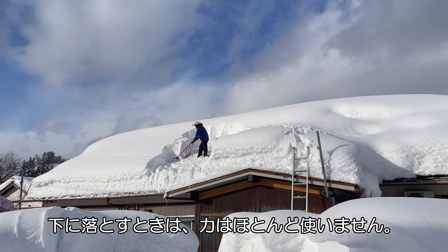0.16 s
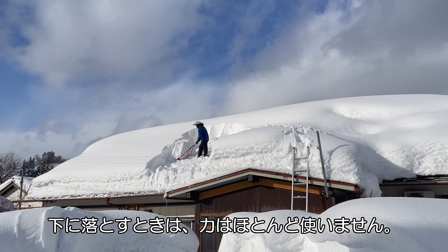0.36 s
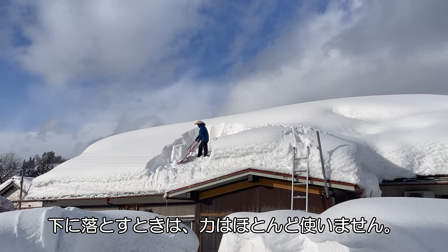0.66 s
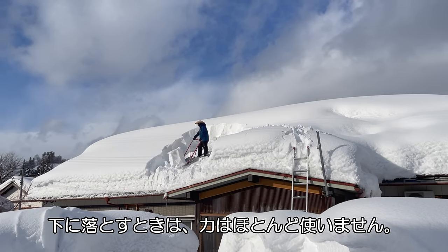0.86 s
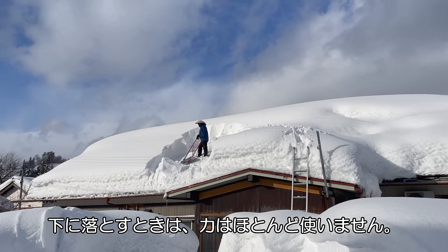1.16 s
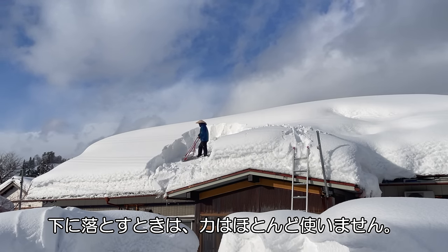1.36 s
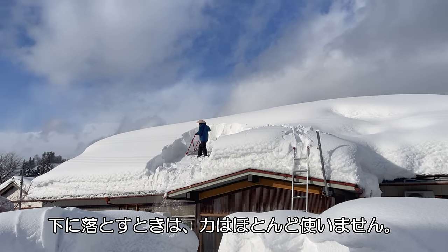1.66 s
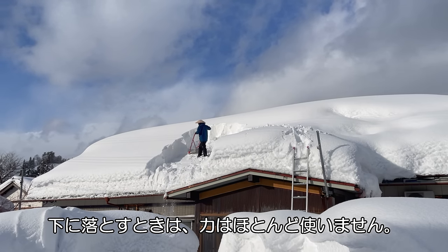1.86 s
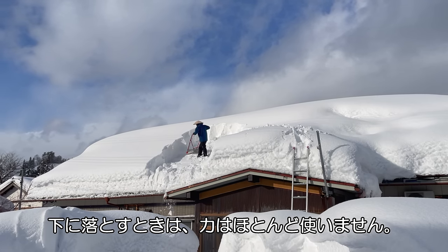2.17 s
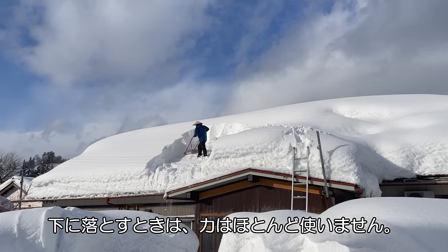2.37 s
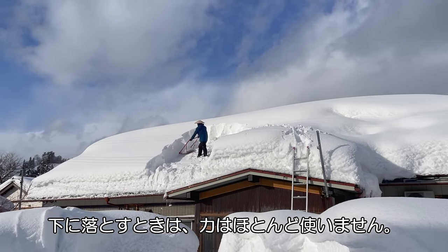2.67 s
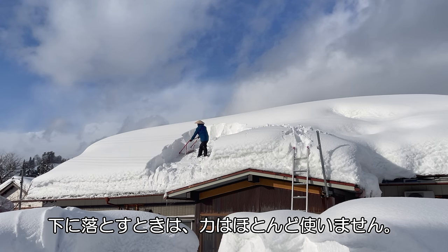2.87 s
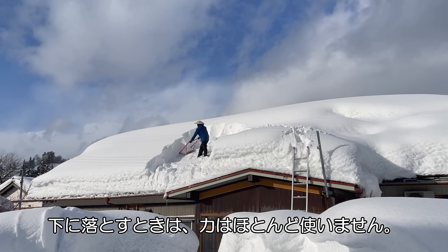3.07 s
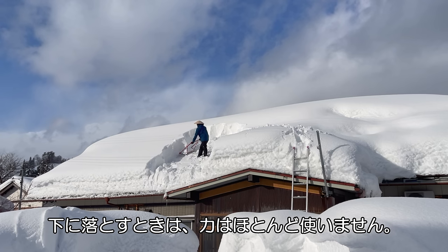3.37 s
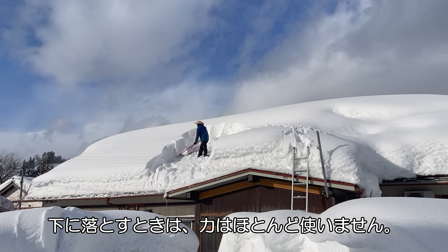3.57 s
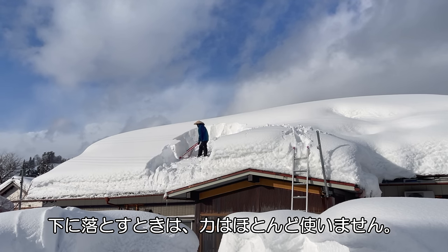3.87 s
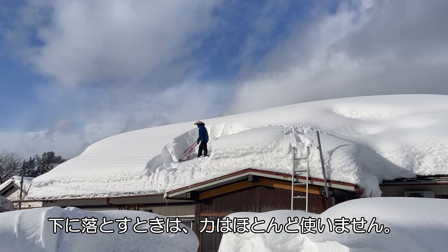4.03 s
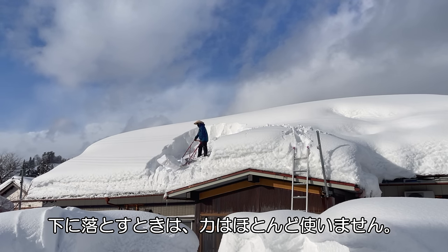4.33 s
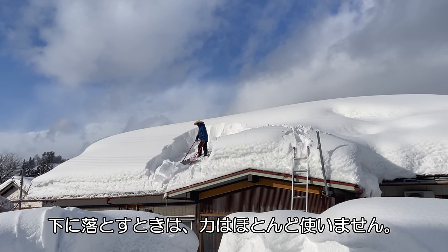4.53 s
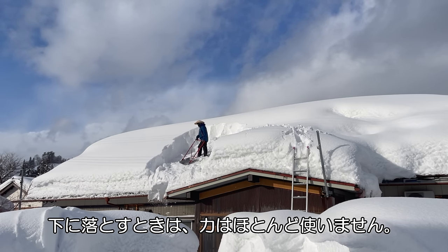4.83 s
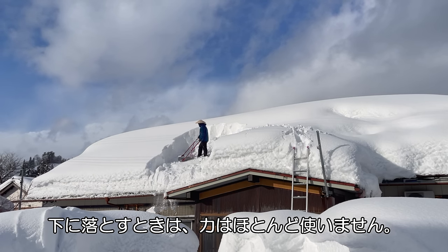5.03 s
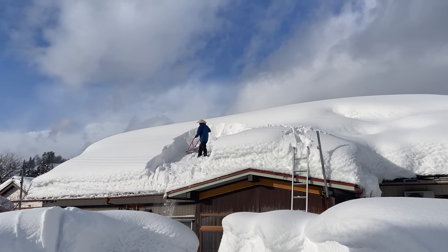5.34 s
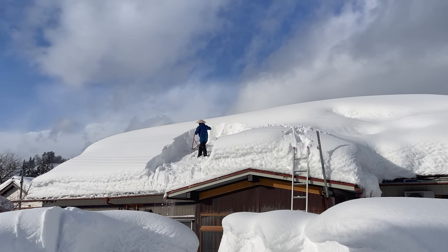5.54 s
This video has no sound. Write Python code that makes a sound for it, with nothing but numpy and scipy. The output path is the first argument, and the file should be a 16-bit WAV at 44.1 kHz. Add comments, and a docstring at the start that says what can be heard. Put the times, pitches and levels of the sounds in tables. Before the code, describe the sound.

Close-sounding dry swishes, gritty and cloth-like with bright fizz and low crunch, start and stop unevenly as snow is cut and slid off a roof. One builds to a loud scuff midway; later ones quicken into short jabs with clicks. Low wind rumble and rounded thumps press on an outdoor stereo microphone, heavily around two seconds and again after three, over a steady faint distant hiss.

```python
"""Dry swishing rub close by in gusty wind

Dry swishes come and go in strokes: shaped noise in three layers, scrape, fizz and crunch.
Ticks are short decaying tones, scuffs are resonant noise bursts, dull knocks are brief low swings.
Wind buffets the microphone in soft low thumps over noise for rumble and drone; a faint far hiss stays behind.
The two microphone ports colour the treble and shift it against each other."""
import sys
import numpy as np
from scipy import signal
from scipy.fft import rfft, irfft, next_fast_len
from scipy.io import wavfile
from scipy.ndimage import uniform_filter1d, map_coordinates

SR = 44100
rng = np.random.default_rng(int(sys.argv[2]) if len(sys.argv) > 2 else 0)


def to_wav(sig):
    """Store sig (one row per channel, or 1-D mono) as 16-bit WAV at the path in sys.argv[1].

    Samples outside -1..1 are clipped; the rate is SR.
    """
    pcm = np.clip(np.atleast_2d(sig), -1, 1) * 32767
    pcm = np.round(pcm).astype(np.int16)
    wavfile.write(sys.argv[1], SR, pcm.T)  # frames by channels


N = 251370  # length in samples, 5.7 s


def amp(db):
    """Gain of a level in dB."""
    return 10 ** (np.asarray(db) / 20)


def unit(x):
    """x at rms 1."""
    return x / np.sqrt(np.mean(x ** 2) + 1e-20)


def along(points, hz):
    """Values of (Hz, value) points read on a log frequency axis."""
    f, v = np.transpose(points)
    return np.interp(np.log(hz + 1), np.log(f + 1), v)


def curve(points):
    """One value per sample from (s, value) points."""
    s, v = np.transpose(points)
    return np.interp(np.arange(N) / SR, s, v)


def wobble(rate):
    """A smooth random curve, rate knots a second."""
    knots = rng.standard_normal(int(N * rate / SR) + 4)
    return map_coordinates(knots, [np.arange(N) * rate / SR])


def filtered(x, response):
    """x times a complex response of frequency."""
    m = next_fast_len(N + SR // 2)
    return irfft(rfft(x, m) * response(np.fft.rfftfreq(m, 1 / SR)), m)[..., :N]


def rush(spectrum, alike, patchy_db, grain_db=0, grains_hz=400):
    """Stereo noise of rms 1 with patches of random gain; grain_db makes it gritty."""
    cells = signal.stft(rng.standard_normal((2, N + 512)), nperseg=512)[2]
    patches = uniform_filter1d(rng.standard_normal(cells.shape[1:]), size=6, axis=0)
    patches = unit(uniform_filter1d(patches, size=8, axis=1))
    pair = signal.istft(cells * amp(patchy_db * patches), nperseg=512)[1][:, :N]
    pair = pair * amp(grain_db * wobble(grains_hz))

    def mid_side(hz):
        # the mid-side balance sets how alike left and right are at each frequency
        turn = np.arccos(np.clip(along(alike, hz), -1, 1)) / 2
        return amp(along(spectrum, hz)) * [np.cos(turn), np.sin(turn)]

    mid, side = filtered(pair, mid_side)
    return unit(np.array([mid + side, mid - side]))


def add(track, s, sound):
    """Lays sound into track, centred on s."""
    start = round(s * SR) - len(sound) // 2
    track[start:start + len(sound)] += sound[:len(track) - start]


CRUNCH_GROWS_DB = 4.5  # the crunch grows over a stroke's hold
# strokes of a dry swishing rub: (start [s], hold [s], rise [ms per 20 dB], fall [ms per 20 dB],
# scrape at start [dB], scrape at end [dB], fizz over scrape at start [dB], fizz over scrape at end [dB],
# crunch over scrape at mid-hold [dB]); swish() lifts the fizz further and makes all three uneven
SWISH_STROKES = [(0.0, 0.23, 10, 200, -64, -72, -7.5, -5, 1),
                 (0.305, 0.034, 198, 172, -59, -56.5, 0.5, 1.5, -7.5),
                 (0.503, 0.23, 152, 200, -59, -62, 5.5, 12, -5),
                 (0.862, 0.086, 250, 100, -58.5, -60.5, 4, 4.5, 4.5),
                 (1.002, 0.069, 80, 80, -66.5, -68, 1, 3, 2.5),
                 (1.131, 0.056, 60, 50, -68.5, -69.5, 9.5, 10.5, 0),
                 (1.218, 0.011, 28, 40, -57.5, -59, 5.5, 6, -5.5),
                 (1.27, 0.063, 34, 105, -67.5, -56, 12, 7.5, -2.5),
                 (1.41, 0.099, 77, 27, -63, -63.5, 9, 4.5, -2.5),
                 (1.619, .26, 5, 90, -61.5, -61.5, 3, -1.5, -6.5),
                 (1.924, 0.14, 60, 60, -65, -72, -12, -13, -3),
                 (2.091, 0.41, 90, 60, -57, -49, -1, 5.5, -4), (2.526, 0.01, 35, 49, -49, -44, 6, 2.5, 0),
                 (2.603, 0.21, 50, 150, -69.5, -81.5, -15, -12, 6.5),
                 (2.893, 0.1, 198, 152, -68.5, -72, -5, -4, 2),
                 (3.161, 0.15, 132, 256, -59, -61, -0.5, -9, -5.5),
                 (3.554, 0.36, 200, 102, -69.5, -60, -4.5, 2, -8.5),
                 (3.97, 0.3, 85, 90, -61, -56, 9.5, 3.5, -3.5),
                 (4.346, 0.032, 88, 70, -56.5, -58, 7, 3, -0.5),
                 (4.435, .075, 70, 107, -60, -66.5, 4.5, 9.5, 3),
                 (4.67, 0.13, 82, 60, -71.5, -70, 0, 15, 8), (4.819, 0.024, 60, 128, -56.5, -59, 12, 7, 1),
                 (4.908, 0.022, 60, 50, -69, -60.5, 4, 4, -9), (5.003, 0.025, 60, 46, -59, -52.5, 2, 6, -6),
                 (5.081, 0.15, 40, 92, -61, -64.5, 9.5, -7, 1.5),
                 (5.402, 0.036, 16, 97, -50.5, -48.5, 0.5, 2.5, -8),
                 (5.525, 0.085, 58, 127, -56.5, -61.5, 2, -5, -5.5)]


def strokes():
    """Levels of scrape, fizz and crunch: each stroke rises, leans from its start to its end level and falls."""
    t, power = np.arange(N) / SR, np.zeros((3, N))
    for s, hold, rise_ms, fall_ms, start_db, end_db, fizz_db, fizz_end_db, crunch_db in SWISH_STROKES:
        u = np.clip((t - s) / hold, 0, 1)
        rising_db = 20 * np.maximum(s - t, 0) / (rise_ms / 1000)
        falling_db = 20 * np.maximum(t - s - hold, 0) / (fall_ms / 1000)
        scrape_db = start_db + (end_db - start_db) * u - rising_db - falling_db
        fizz_over_db = fizz_db + (fizz_end_db - fizz_db) * u
        crunch_over_db = crunch_db + CRUNCH_GROWS_DB * (u - .5)
        power = power + amp(scrape_db + np.array([0 * u, fizz_over_db, crunch_over_db])) ** 2
    return np.sqrt(power)


PATCHY_DB = 1.0  # how much a stroke's colour is mottled
# colour of the scrape: (frequency [Hz], relative density [dB per Hz])
SCRAPE_COLOUR = [(900, -11.5), (1400, 1), (2000, 0), (2700, 0), (3500, 3), (5000, -0.5), (7000, -2),
                 (10000, -60), (16000, -46)]
# colour of the fine bright fizz: (frequency [Hz], relative density [dB per Hz])
FIZZ_COLOUR = [(3000, -50), (5000, -8.5), (6500, -3.5), (8000, 1.5), (12000, -4.5), (16000, 0.5)]
# colour of the low crunch: (frequency [Hz], relative density [dB per Hz])
CRUNCH_COLOUR = [(300, -34), (480, -0.5), (600, -0.5), (850, -4.5), (1350, -8.5), (1900, -10.5),
                 (3000, -20.5)]
# stereo width of the crunch: (frequency [Hz], left-right likeness [0 to 1])
CRUNCH_LIKENESS = [(500, 0.2), (900, 0.077), (1400, 1)]


def swish():
    """Dry swishing rub, like cloth: scrape, fine fizz and low crunch share the stroke's unevenness."""
    scrape, fizz, crunch = strokes() * amp(0.94 * wobble(30))
    scrape = scrape * rush(SCRAPE_COLOUR, [(1000, 0.97)], PATCHY_DB, grain_db=1.0)
    fizz = fizz * amp(1.0) * rush(FIZZ_COLOUR, [(1000, 0.95)], PATCHY_DB, grain_db=1.5)
    crunch = crunch * amp(1.1 * wobble(20))  # the crunch is more uneven still
    crunch = crunch * rush(CRUNCH_COLOUR, CRUNCH_LIKENESS, PATCHY_DB, grain_db=2.0, grains_hz=120.1)
    return scrape + fizz + crunch


EDGE_FROM_DB, EDGE_GROWS = -29.5, 1.46  # swings above this level get a sharper edge, dB per dB


def swings(table, rise, linger, rough, sag, soft_db):
    """Short low swings: a dip of pressure rises fast, lingers and sags in pitch; hard ones have a sharp edge."""
    out, t = np.zeros(N), np.arange(-SR // 12, SR // 12) / SR
    for s, db, hz, ms in table:
        u = t / (ms / 1000)
        shape = np.exp(-np.where(u < 0, rise * u ** 4, linger * u ** 2))
        waver = rough * np.cumsum(rng.standard_normal(len(t))) / np.sqrt(len(t))
        phase = 2 * np.pi * hz * t * (1 - sag * np.tanh(u * 1.57)) + waver
        edge_db = soft_db + EDGE_GROWS * max(db - EDGE_FROM_DB, 0)
        edge = amp(edge_db) * np.exp(-(4 * hz * t) ** 2) * np.cos(1.7 * phase)
        add(out, s, -amp(db) * (shape * np.cos(phase) + edge))
    return out


# gusts swelling the rumble, before its random wobble: (time [s], level [dB])
RUMBLE_GUSTS = [(0.0, -55), (0.36, -53), (0.67, -50.5), (1.33, -62), (1.62, -57), (2.0, -38), (2.2, -51.5),
                (2.48, -48), (2.87, -45.5), (3.09, -46), (3.19, -50), (3.63, -56.5), (3.97, -49),
                (4.14, -53.5), (4.75, -54), (5.03, -50), (5.21, -53.5), (5.7, -61)]
# low drone of the wind, before its random wobble: (time [s], level [dB])
DRONE_LEVEL = [(0.0, -59), (0.75, -53.5), (1.11, -60.5), (1.35, -60.5), (1.55, -60), (1.86, -57),
               (2.24, -59.5), (2.43, -51), (2.73, -63), (2.94, -60), (3.76, -61.5), (3.94, -59.5),
               (4.16, -55), (4.37, -54.5), (4.52, -59), (4.73, -59), (5.06, -57), (5.7, -58)]
# puffs of wind on the ports: (time [s], level before the sharp edge [dB], pitch at centre [Hz], time scale [ms])
WIND_THUMPS = [(0.107, -37.5, 60.4, 30), (0.16, -37, 60, 22), (0.22, -38, 59.4, 13), (0.291, -38, 61, 41),
               (0.372, -46, 70, 23), (0.5, -41, 57.6, 24), (0.715, -42, 57, 22), (1.39, -45, 67, 19),
               (1.585, -40.5, 71, 21), (1.61, -41, 59, 20), (1.75, -46, 72, 22), (1.798, -37, 64, 11),
               (1.832, -36, 85, 27), (1.867, -25.5, 72.5, 17), (1.883, -30, 85, 7), (1.897, -29.5, 80, 18),
               (1.928, -20, 78, 15.6), (1.962, -29, 65.4, 11), (2.0, -34, 59, 6.8), (2.026, -23.5, 63, 23),
               (2.072, -36, 57, 19), (2.139, -38.5, 67.5, 14), (2.182, -29, 61.5, 18),
               (2.651, -36.5, 62, 27), (2.712, -34.5, 57.6, 13.8), (2.854, -39, 62.6, 40),
               (2.93, -38, 65, 16), (2.979, -32.5, 68.4, 32), (3.045, -41, 55, 24), (3.13, -24.5, 69, 14.7),
               (3.151, -30, 66.4, 21), (3.195, -32, 54.3, 15), (3.258, -34.5, 78, 20),
               (3.416, -24.5, 78, 21), (3.515, -44, 59, 21), (3.632, -44.5, 56.7, 33), (3.765, -45, 50, 24),
               (3.877, -34, 54.4, 29), (3.985, -44.5, 60.3, 36), (4.06, -41, 64, 42),
               (4.352, -30.5, 66.6, 27), (4.419, -34.5, 66.6, 19), (4.819, -39.5, 56, 32),
               (4.959, -31, 59, 19), (5.012, -34, 65, 20), (5.033, -28, 77, 15), (5.078, -31.5, 60, 25),
               (5.213, -38, 83, 19), (5.4, -41, 54.6, 24), (5.506, -37, 61.5, 26), (5.605, -42, 58, 14),
               (5.653, -37.5, 52.7, 26)]
# colour of the rumble: (frequency [Hz], relative density [dB per Hz])
RUMBLE_COLOUR = [(12, -27), (20, -13), (38, 3), (59, 3.5), (97, -4), (140, -17), (250, -26), (320, -28),
                 (550, -120)]
# colour of the drone: (frequency [Hz], relative density [dB per Hz])
DRONE_COLOUR = [(90, -18), (140, 0.5), (230, -1), (330, -4), (450, -7.5), (650, -23), (1200, -52)]
# stereo width of the drone: (frequency [Hz], left-right likeness [0 to 1])
DRONE_LIKENESS = [(130, 0.89), (260, 0.83), (500, 0.3)]


def wind():
    """Rumble and thumps press both ports almost alike; the drone above differs between them."""
    rumble = amp(curve(RUMBLE_GUSTS) + 1.5 * wobble(14))
    rumble = rumble * rush(RUMBLE_COLOUR, [(60, 0.91)], patchy_db=0.55)
    drone = amp(curve(DRONE_LEVEL) + 2.2 * wobble(14))
    drone = drone * rush(DRONE_COLOUR, DRONE_LIKENESS, patchy_db=1.0)
    thumps = swings(WIND_THUMPS, rise=18.0, linger=0.66, rough=0, sag=0.17, soft_db=-16.5)
    return (rumble + thumps) * amp([[-.6], [.6]]) + drone  # a little louder on the right


# colour of the far hiss: (frequency [Hz], relative density [dB per Hz])
HISS_COLOUR = [(500, 0.5), (900, -4.5), (1500, -8.5), (3000, -16), (5000, -19.5), (7500, -24),
               (9000, -23.5), (11000, -28.5), (16000, -19)]


def far_hiss():
    """Far hiss: wide, mottled noise at a steady faint level."""
    return amp(-64) * rush(HISS_COLOUR, [(1000, 0.27)], patchy_db=3.0)


# short dry ticks: (time [s], peak level [dB], pitch [Hz])
SHORT_TICKS = [(1.068, -36.5, 9550), (1.2755, -43, 3700), (1.327, -51, 1980), (2.5323, -35, 3200),
               (2.7645, -52, 1500), (3.514, -43, 3610), (4.3552, -28, 3500), (4.4362, -42, 2260),
               (4.4704, -32, 6000), (4.649, -53, 1540), (4.817, -27, 8150), (5.3034, -49, 2700)]


def ticks(turns):
    """Short dry ticks: each a click of about one cycle."""
    out, t = np.zeros(N), np.arange(-SR // 100, SR // 100) / SR
    for s, db, hz in SHORT_TICKS:
        slope_db = np.where(t < 0, 30, 12 / turns)  # dB per cycle, steep before the peak, gentler after
        add(out, s, amp(db - hz * np.abs(t) * slope_db) * np.cos(2 * np.pi * hz * t))
    return out


# short scuffs: (time [s], peak level before scene() lowers it [dB], pitch [Hz], burst's 60 dB decay [ms])
RUB_SCUFFS = [(1.274, -40.5, 3760, 34), (1.3073, -37, 8960, 37), (1.3245, -38.5, 1730, 28),
              (2.53, -29, 3220, 49), (3.9658, -39, 1630, 78), (4.818, -48, 8200, 18),
              (4.986, -46, 3580, 40), (5.012, -42, 2790, 52), (5.0523, -31, 9400, 44),
              (5.0765, -37.5, 2690, 110), (5.396, -52, 1750, 54), (5.426, -29, 7100, 33),
              (5.502, -45, 6750, 43)]


def scuffs(sharpness, rise_ms):
    """Short scuffs: bursts of noise that start at once, each loudest around its own pitch."""
    out, t = np.zeros(N), np.arange(-SR // 10, SR // 10) / SR
    after = np.maximum(t, 0)
    rise = 1 - np.exp(-after / (rise_ms / 1000))
    for s, db, hz, ms in RUB_SCUFFS:
        burst = amp(-60 * after / (ms / 1000)) * rise * rng.standard_normal(len(t))
        ring = signal.lfilter(*signal.iirpeak(hz, sharpness, SR), burst)
        add(out, s, amp(db) * ring / np.abs(ring).max())
    return out


# dull hollow knocks: (time [s], level before the edge [dB], pitch at centre before waver [Hz], time scale [ms])
HOLLOW_KNOCKS = [(1.335, -48, 320, 14), (4.238, -52, 555, 16), (4.266, -46, 575, 15.5),
                 (4.398, -48, 597, 21), (5.213, -46, 290, 33), (5.374, -42, 268, 10),
                 (5.388, -39.5, 279, 10)]


def knocks():
    """Dull hollow knocks: short swings whose phase wavers at random, with hardly any edge."""
    return swings(HOLLOW_KNOCKS, rise=18.0, linger=1.8, rough=5.2, sag=0.036, soft_db=-40)


def scene():
    """Swishes, ticks, scuffs and knocks in front, wind at the ports, far hiss behind."""
    front = swish() + ticks(turns=0.81) + amp(-6.0) * scuffs(sharpness=1.0, rise_ms=1.9) + knocks()
    return front * amp([[-.4], [.4]]) + wind() + far_hiss()  # front leans slightly right


TOP_HZ = 15760  # band limit
# treble colour of both ports: (frequency [Hz], gain [dB])
PORT_GAIN = [(7800, 0.5), (8800, -5), (9500, 2.5), (10700, 9), (11500, 5), (12200, -6), (12600, -34),
             (13600, -46), (14100, -8), (14800, -13), (15500, -21)]
# phase of right against left: (frequency [Hz], shift [radians])
PORT_SHIFT = [(60, .3), (700, .5), (1150, -.1), (2400, .05), (3200, .6), (4200, .1), (5300, .7),
              (6600, .05), (7000, .05), (7700, .8), (8500, .1), (8900, -.2), (10300, -3.14), (11750, -6.28),
              (12500, -6.28), (14000, -9.42), (14500, -9.5), (15250, -12.56)]


def record(dry):
    """Ports peak near 11 kHz and turn the phase oppositely; deep bass and all above the band limit are cut."""
    def response(hz):
        ports = amp(along(PORT_GAIN, hz)) * np.exp(.5j * along(PORT_SHIFT, hz) * np.array([[-1], [1]]))
        bass_cut = hz ** 2 / (hz ** 2 + 30 ** 2)  # half the amplitude at 30 Hz
        return ports * bass_cut * (hz < TOP_HZ)

    return filtered(dry, response)


dry = scene()
out = record(dry)
to_wav(out)
```